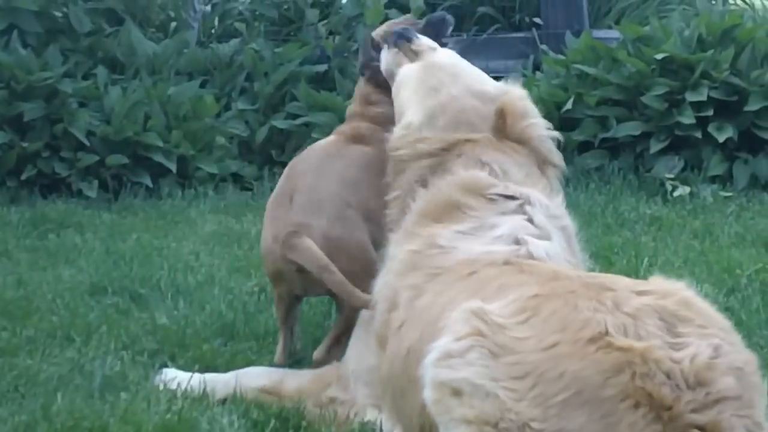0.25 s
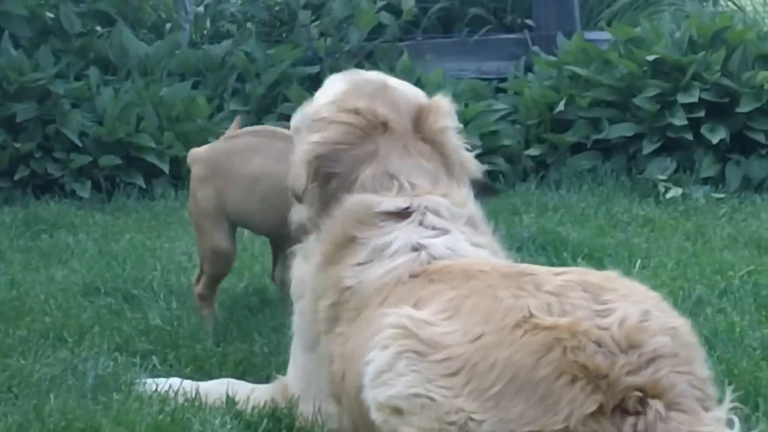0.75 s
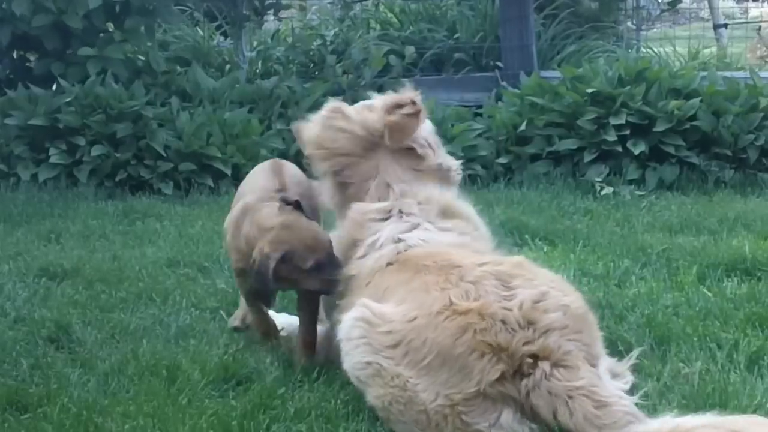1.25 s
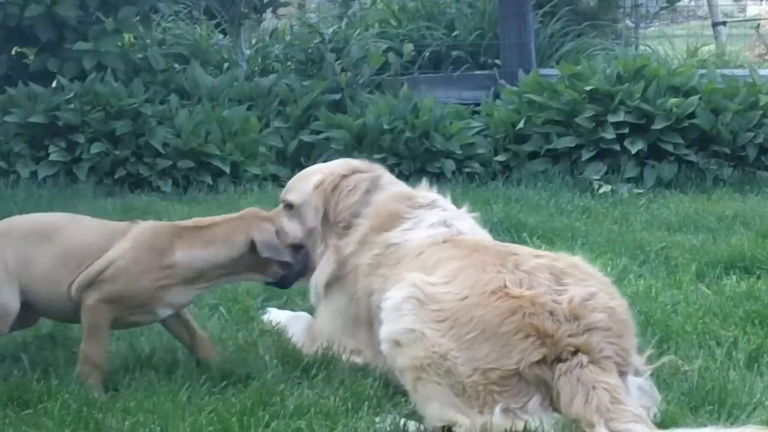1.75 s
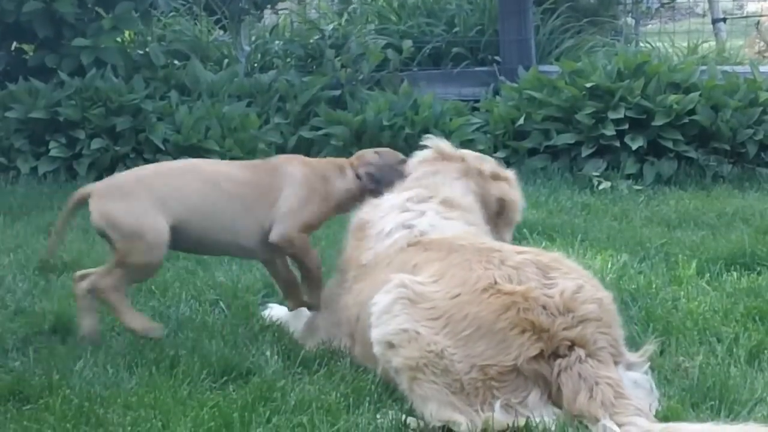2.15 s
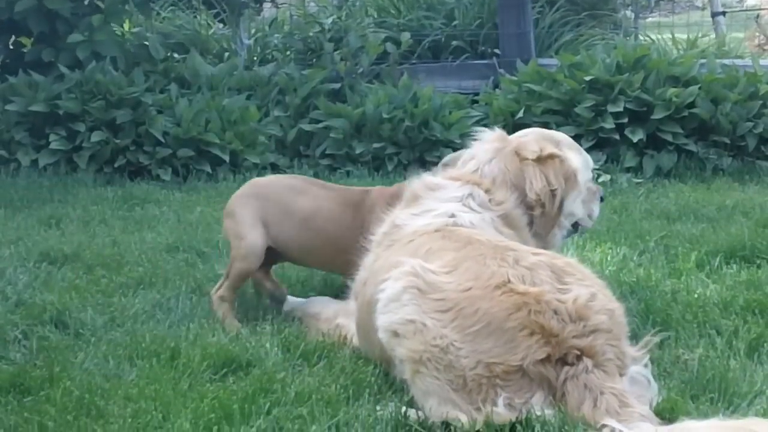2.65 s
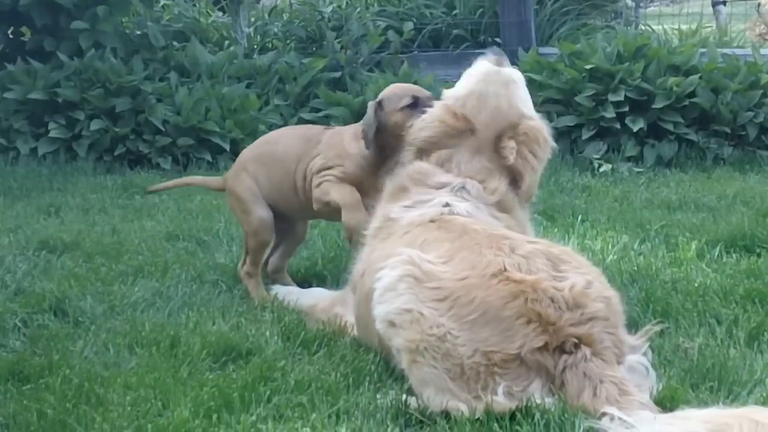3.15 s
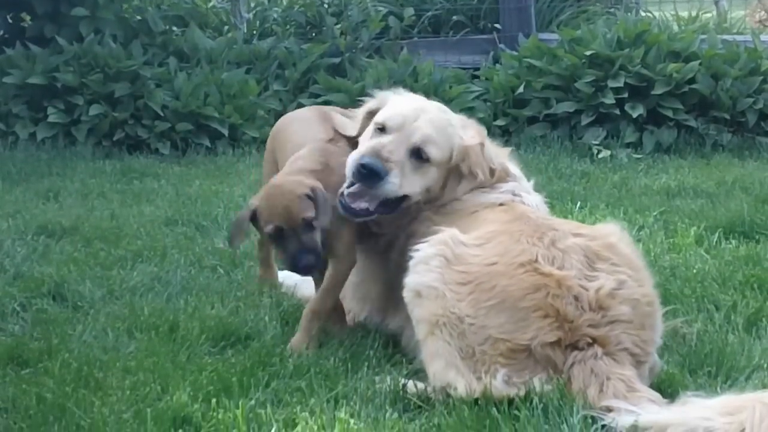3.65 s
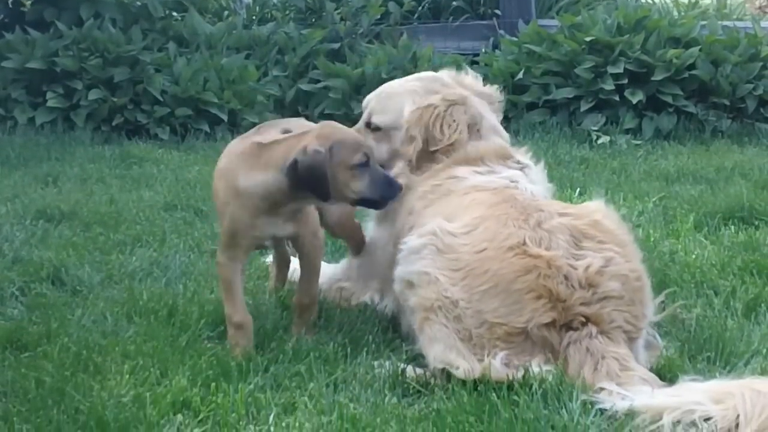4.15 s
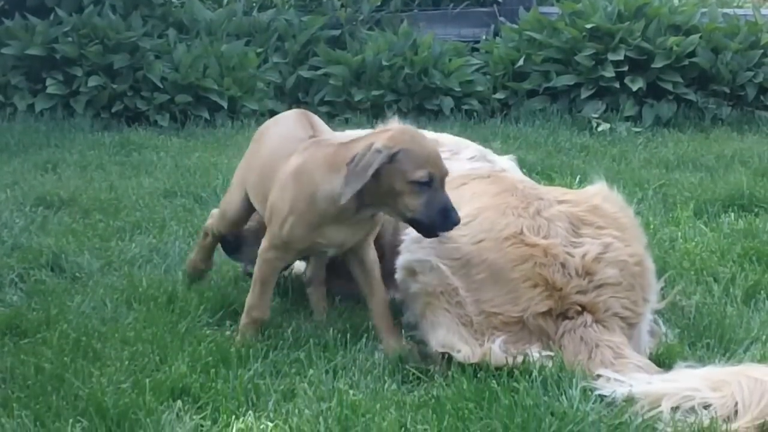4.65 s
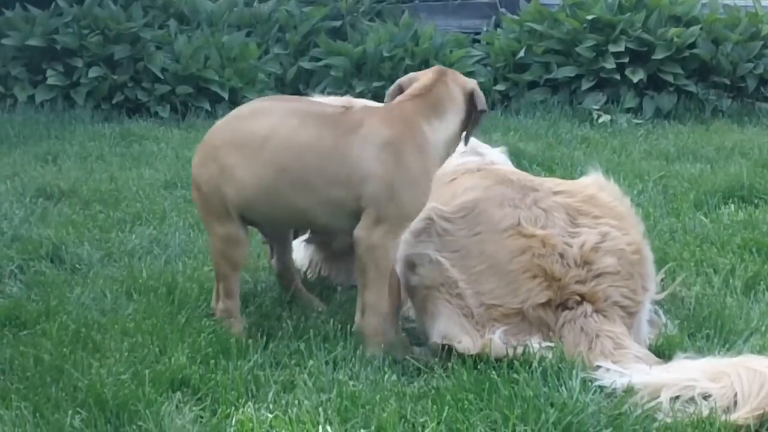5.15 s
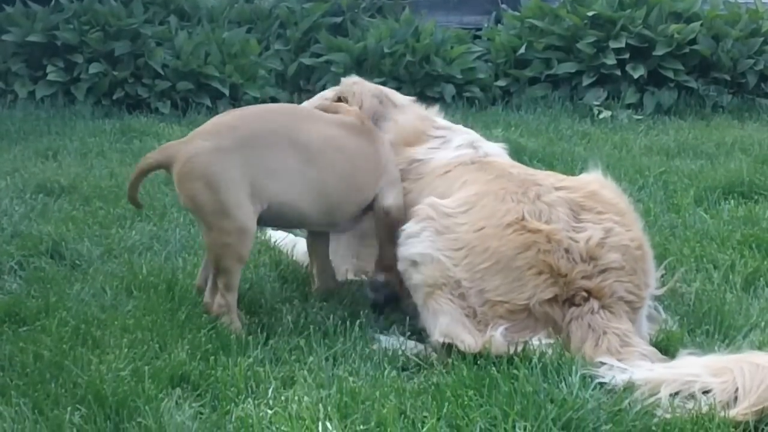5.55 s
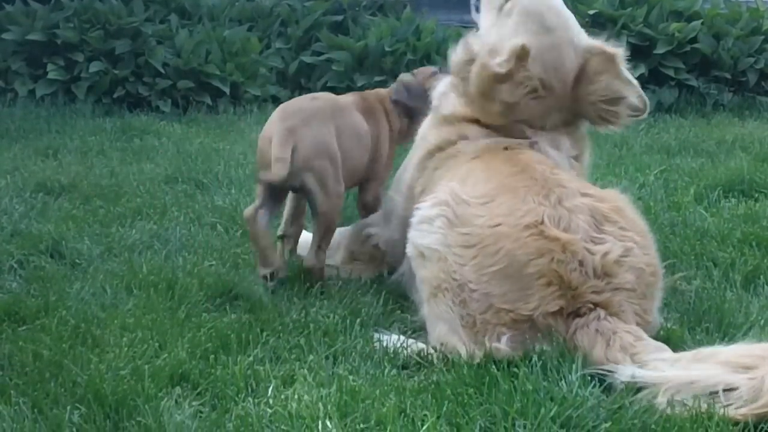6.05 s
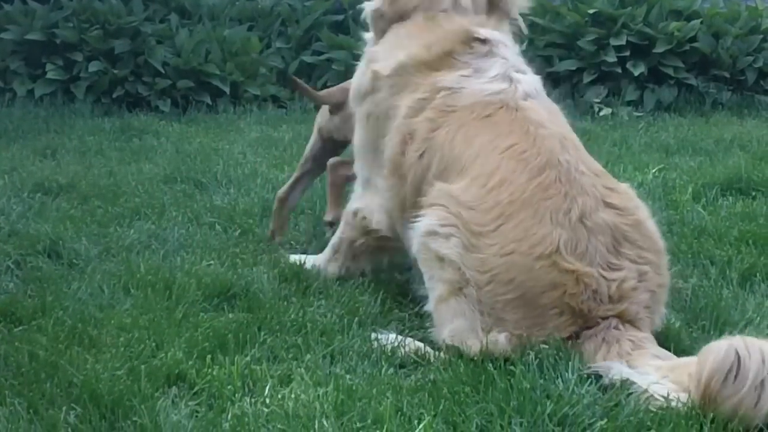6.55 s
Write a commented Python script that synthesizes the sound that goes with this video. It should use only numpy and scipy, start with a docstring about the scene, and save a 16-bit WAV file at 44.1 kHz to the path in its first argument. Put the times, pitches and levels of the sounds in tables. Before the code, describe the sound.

Outdoors, low wind buffets rumble over faint leaves and traffic while a far-off circular saw rasps, runs up, whines high and droops under load.

```python
"""A power saw some gardens away is blipped, coasts, restarts, runs up and sags under load.
Its teeth chop the air into a whine that follows the blade speed, with gear tones moving alongside.
Motor and blade noise rush through the guard, gears rasp at each start, and other modes sing for a moment.
Wind eddies thump on the single microphone port over far traffic and leaves; the loudest thumps
make the gain control duck."""
import sys
import numpy as np
from scipy import signal
from scipy.fft import rfft, irfft, next_fast_len
from scipy.io import wavfile
from scipy.ndimage import uniform_filter1d, map_coordinates

SR = 44100
rng = np.random.default_rng(int(sys.argv[2]) if len(sys.argv) > 2 else 0)


def put_to_file(sound):
    """Save the sound as 16-bit audio at rate SR, in the file named by the first command-line argument."""
    columns = np.atleast_2d(sound).T  # one column per channel
    safe = np.clip(columns, -1, 1)
    whole_steps = np.round(safe * 32767)
    wavfile.write(sys.argv[1], SR, whole_steps.astype(np.int16))


N = 300321

# far traffic and leaves, relative spectrum: freq_hz, density_db (per Hz)
YARD_SPECTRUM = [(350, -49), (600, -9.5), (787, -10.5), (1050, -11), (1130, -15), (1390, -10.5),
                 (2390, -21), (15300, -33.5)]
YARD_DB = -45.5  # rms

# wind buffeting between the eddies: time_s, level_db
BUFFET_LEVEL = [(0, -21), (.12, -44.5), (.45, -30), (.68, -41.5), (.78, -23), (1, -32), (1.1, -12.5),
                (1.4, -14.5), (1.76, -39), (2.04, -36), (2.15, -24), (2.28, -28), (2.45, -20.5),
                (2.56, -31.5), (2.8, -35), (2.9, -24), (3.25, -30), (3.34, -30.5), (3.55, -43.5),
                (3.92, -41), (3.98, -27.5), (4.27, -30), (4.36, -37), (4.6, -33), (4.9, -28.5),
                (5.28, -29.5), (5.4, -20.5), (5.62, -29), (5.7, -36), (5.89, -37), (5.95, -22.5),
                (6.12, -21.5), (6.33, -30), (6.43, -32), (6.54, -37)]
# relative spectrum of the buffeting: freq_hz, density_db (per Hz)
BUFFET_SPECTRUM = [(12, -49), (20, -36), (59, -0.5), (140, 3), (300, -13.5), (328, -10.5), (544, -20.5),
                   (586, -31.5), (700, -32.5), (910, -41), (1540, -120)]
# single eddies: centre_s, strength_db (before the thump filter), pitch_hz
EDDIES = [(.01, -8, 194), (.068, -20, 168), (.104, -18.5, 159), (.241, -15, 121), (.526, -6, 164),
          (.58, -11.5, 188), (.767, -2, 279), (.775, -3, 226), (.818, -4, 275), (.935, -10.5, 180),
          (.951, -10, 308), (.962, -9, 153), (1.016, -8, 218), (1.073, 1, 307), (1.113, 4, 187),
          (1.145, 1, 228), (1.16, 1, 213), (1.168, 1.5, 317), (1.194, -4, 157), (1.227, 1.5, 278),
          (1.242, 8.5, 286), (1.261, 0, 271), (1.301, 6.5, 292), (1.318, 1, 269), (1.349, 1, 200),
          (2.194, -11, 183), (2.237, -2, 224), (2.372, -6.5, 220), (2.485, 0, 211), (2.955, -12, 166),
          (2.995, -7.5, 230), (3.194, -9.5, 201), (3.266, -10, 178), (3.281, .5, 265), (4.094, -7, 177),
          (4.238, -7.5, 236), (4.691, -6, 200), (5.211, -10.5, 159), (5.331, -12, 253), (5.345, -10.5, 169),
          (5.475, -12, 215), (5.611, -12, 163), (6.006, -2.5, 198), (6.099, -7, 201), (6.141, -7, 187),
          (6.158, -4, 174), (6.327, -7.5, 195), (6.437, -12, 145), (6.669, -13.5, 230)]
# lesser eddies at random: strength over the buffet and its scatter, typical pitch and its log spread
FLUTTER_PER_S = 70
FLUTTER_DB, FLUTTER_SCATTER_DB, FLUTTER_HZ, FLUTTER_SPREAD = 9.5, 2.5, 207.5, .2

# the switch is pressed and the gears rasp: start_s, length_s (until the fade), level_db
STARTS = [(0.23, 0.14, -27), (1.114, 0.093, -26)]
# relative spectrum of the gear rasp: freq_hz, density_db (per Hz)
RASP_SPECTRUM = [(500, -6), (800, -10), (1100, -0.5), (1600, -4), (2200, 3), (2800, -11.5), (5000, -38)]
RASP_ATTACK_S, RASP_FADE_DB_PER_S = 0.025, 50

# broadband noise of the saw: time_s, body_db, hiss_over_body_db
RUSH_LEVEL = [(.236, -39.5, -7), (.26, -36.5, -7), (.4, -29.5, -8.5), (.46, -38.5, -3), (.56, -42.5, -4),
              (.85, -44.5, -6), (1.12, -43.5, -4.5), (1.14, -31.5, -7), (1.25, -34, -5),
              (1.64, -27.5, -2.5), (2.36, -27.5, -2), (2.6, -27.5, 0.5), (3.08, -30, -1.5),
              (3.15, -28.5, 1), (3.3, -30.5, 1.5), (3.7, -30.5, 1), (3.78, -29, 1.5), (5.2, -28, 0.5),
              (6, -28, -1.5), (6.3, -30, -2), (6.81, -27.5, -0.5)]
# depth of the hiss throb, once a turn of the blade: time_s, depth (0-1)
THROB_DEPTH = [(1.2, 0.3), (2, 0.26), (4.3, 0.26), (4.8, 0.2), (6.81, 0.28)]
# relative spectrum of the body noise: freq_hz, density_db (per Hz)
BODY_SPECTRUM = [(290, -30), (500, -10), (742, -15), (1050, -6), (1600, -7), (1890, -1), (2480, -4.5),
                 (2900, 0), (4870, -6.5), (6000, -10), (7800, -10.5), (13200, -120)]
# relative spectrum of the blade hiss: freq_hz, density_db (per Hz)
HISS_SPECTRUM = [(3500, -2.5), (5500, -4), (7000, -2), (8500, 3.5), (10800, 2), (12000, -12), (13500, -7.5),
                 (15500, -4.5)]
# resonances of guard and blade: centre_hz, width_hz, lift_db
GUARD_MODES = [(1064, 37, 6.5), (1208, 20, 5.5), (1884, 37, 1.5), (2342, 26, 7), (2868, 18, 4.5),
               (3066, 57, 3), (3920, 61, 3), (4254, 22, 7), (4960, 140, 7), (8090, 115, 7.5),
               (9350, 104, 4.5)]

TEETH = 61
# speed of the saw, coasting, running up, sagging: time_s, tooth_whine_hz
SPEED = [(.42, 3930), (.55, 3750), (.8, 3360), (1.14, 2840), (1.19, 2660), (1.32, 3327), (1.45, 3887),
         (1.62, 4429), (1.75, 4670), (1.9, 4865), (2.15, 5072), (2.5, 5236), (3.1, 5395), (3.75, 5441),
         (4.05, 5390), (4.45, 5232), (4.75, 5025), (5.2, 4905), (5.55, 4768), (6.2, 4665), (6.81, 4667)]
# span of each state: start_s, end_s
COAST_SPAN = (.43, 1.14)
RUN_SPAN = (1.17, 6.76)
LOAD_SPAN = (4.2, 6.9)
# gear tones that swell as they cross a resonance, one table a state:
# whine_multiple, resonance_hz, resonance_width_hz, level_db, tone_width_hz
COAST_TONES = [(1.31, 4960, 250, -46, 6), (.5, 1810, 100, -37, 6), (.645, 2250, 110, -43, 6),
               (1, 2970, 300, -46, 6), (3.03, 9400, 1000, -52, 700)]
RUN_TONES = [(2, 9850, 400, -42, 8)]
LOAD_TONES = [(1.57, 7950, 800, -37, 200), (2.345, 11000, 700, -43, 200)]
# how loud the whine leaves the guard at each pitch: pitch_hz, level_db
WHINE_LEVEL = [(2650, -41), (3400, -42), (4430, -43), (4660, -40), (4720, -34), (4775, -44), (4850, -32),
               (4960, -29), (5110, -29), (5240, -36), (5320, -32), (5440, -31)]
WAVER_DB = 1  # slow unsteadiness of the whine
TORQUE_DB, TORQUE_HZ_PER_S = 6, 900  # most lift of the whine, and the climb in pitch that sets its scale

# pitch of one faint singing mode: time_s, pitch_hz
SING_PITCH = [(5.9, 1858), (6.3, 1842), (6.81, 1838)]
# swells of that mode: middle_s, length_s, level_db
SING_SWELLS = [(4.02, .4, -37), (5.85, .2, -35), (6.13, .15, -42), (6.46, .09, -38), (6.6, .09, -38)]
SING_DB, SING_FROM_S = -41.5, 3.03
# other modes of blade and guard that sound for a moment: pitch_hz, start_s, end_s, level_db, width_hz
CHIRPS = [(9150, .54, 0.82, -48, 800), (9600, 1.4, 1.56, -35, 540), (6650, 1.52, 1.8, -41, 250),
          (9700, 1.57, 1.76, -36, 300), (2000, 2.11, 2.28, -31, 15), (1825, 2.56, 2.76, -35, 15),
          (1960, 5.17, 5.34, -33.5, 20)]

LIMIT_DB, DUCK_S, RECOVER_DB_PER_S = -5.5, 0.0074, 10.5  # peak limit, time constant down, slow climb back
# missing band of the treble: low_hz, high_hz
GAP_BAND = (12290, 12710)
TOP_HZ = 15310  # band limit
CEILING = .9  # amplitude toward which loud thumps are rounded off


def amp(db):
    """Logarithmic level: decibels to an amplitude ratio."""
    return 10 ** (np.asarray(db) / 20)


def unit(x):
    """Normalisation to rms 1."""
    return x / np.sqrt(np.mean(x ** 2) + 1e-20)


def curves(rows):
    """Linear interpolation: one value per sample for each column after the time."""
    s, *cols = np.transpose(rows)
    return [np.interp(np.arange(N) / SR, s, c) for c in cols]


def window(start, end, edge):
    """Gating: 1 between the two times, with straight ramps just inside them."""
    t = np.arange(N) / SR
    return np.clip(np.minimum(t - start, end - t) / edge, 0, 1)


def wobble(rate):
    """Slow random modulation: a smooth curve through normal random knots, rate knots a second."""
    knots = rng.standard_normal(int(N * rate / SR) + 4)
    return map_coordinates(knots, [np.arange(N) * rate / SR])


def filtered(x, response):
    """Linear filtering: the spectrum of x times a response of frequency."""
    m = next_fast_len(N + 8192)
    return irfft(rfft(x, m) * response(np.fft.rfftfreq(m, 1 / SR)), m)[..., :N]


def noise(points, patchy_db=0, modes=(), band_hz=(0, 1e5)):
    """Spectral shaping: noise with patches of random gain and raised modes, rms 1 inside the band."""
    z = signal.stft(rng.standard_normal(N), nperseg=512)[2]
    field = uniform_filter1d(rng.standard_normal(z.shape), size=8, axis=0)
    field = uniform_filter1d(field, size=12, axis=1)
    patchy = signal.istft(z * amp(patchy_db * unit(field)), nperseg=512)[1][:N]
    # fall to silence an octave beyond either end
    below, above = (points[0][0] / 2, -120), (points[-1][0] * 2, -120)
    f, level = np.transpose([below] + list(points) + [above])

    def response(hz):
        lift = sum(db / (1 + (2 * (hz - c) / w) ** 2) for c, w, db in modes)
        return amp(np.interp(np.log(hz + 1), np.log(f), level) + lift)

    x = filtered(patchy, response)
    inside = filtered(x, lambda hz: (hz > band_hz[0]) & (hz < band_hz[1]))
    return x / np.sqrt(np.mean(inside ** 2))


def tone(hz, blur, flutter_db):
    """Phase and amplitude modulation: an unsteady sine, rms about 1."""
    size = np.sqrt(2) * amp(flutter_db * wobble(25))
    phase = 2 * np.pi * np.cumsum(hz) / SR + blur * wobble(60)
    return size * np.sin(phase)


def fuzzy(hz, width_hz):
    """Narrow-band modulation: noise rides on a carrier that follows a pitch curve, rms 1."""
    carrier = np.exp(2j * np.pi * np.cumsum(hz) / SR)
    core = 1.2 * (width_hz < 50)  # narrow ones keep a clear core
    return unit(np.real((core + wobble(width_hz) + 1j * wobble(width_hz)) * carrier))


def blade_turn(whine_hz):
    """Tooth passing: the blade turns once for every TEETH cycles of the whine; phase in radians."""
    return 2 * np.pi * np.cumsum(whine_hz / TEETH) / SR


def yard():
    """Diffuse background: far traffic and leaves merge into steady coloured noise."""
    return amp(YARD_DB) * noise(YARD_SPECTRUM)


def flutter():
    """Random arrivals: small eddies at random times, stronger where the wind is stronger."""
    count = int(FLUTTER_PER_S * N / SR)
    s = rng.random(count) * N / SR
    size, pitch = rng.standard_normal((count, 2)).T
    buffet_db = np.interp(s, *np.transpose(BUFFET_LEVEL))
    strength_db = buffet_db + FLUTTER_DB + FLUTTER_SCATTER_DB * size
    return np.transpose([s, strength_db, FLUTTER_HZ * np.exp(FLUTTER_SPREAD * pitch)])


def wind():
    """Turbulent pressure: lumpy buffeting, and eddies of about one cycle; small fast ones also snap."""
    buffet = amp(curves(BUFFET_LEVEL)[0]) * unit(amp(5.6 * wobble(50)) * noise(BUFFET_SPECTRUM))
    t = np.arange(-1500, 1500) / SR  # time about the centre of an eddy
    eddies = [*EDDIES, *flutter()]
    thumps = np.zeros(N + 2 * len(t))
    phases = rng.random((len(eddies), 2))
    for (s, db, hz), (phase, snap_phase) in zip(eddies, phases):
        push = np.exp(-np.abs(t * hz / 0.38) ** 1.16) * np.cos(2 * np.pi * (hz * t + phase))
        snap = np.exp(-(t / .0012) ** 2) * np.cos(2 * np.pi * (2.4 * hz * t + snap_phase))
        snap_gain = amp(-15.5) * (hz / 280) ** 3.0
        thumps[round(s * SR):][:len(t)] += amp(db) * (push + snap_gain * snap)
    thumps = thumps[len(t) // 2:][:N]
    # low cut at 50 Hz, high cut at 1300 Hz
    thumps = filtered(thumps, lambda f: f ** 2 / (f ** 2 + 50 ** 2) / (1 + (f / 1300) ** 4))
    return buffet + thumps


def rasp():
    """Gear meshing: grainy noise under the starting torque, fading once it is over."""
    t = np.arange(N) / SR
    level = np.zeros(N)
    for s, length, db in STARTS:
        fade_db = RASP_FADE_DB_PER_S * np.clip(t - s - length, 0, None)
        level += amp(db - fade_db) * window(s, 9, RASP_ATTACK_S)
    return level * unit(amp(1.4 * wobble(250)) * noise(RASP_SPECTRUM, patchy_db=0.5))


def rush():
    """Resonant radiation: motor and blade noise through the guard; the hiss throbs as the blade wobbles."""
    body_db, hiss_db = curves(RUSH_LEVEL)
    turn = blade_turn(curves(SPEED)[0])
    throb = 1 + np.clip(curves(THROB_DEPTH)[0], 0, 1) * np.sin(turn + .5 * wobble(5.7))
    surge_db = 0.32 * wobble(14)
    body = noise(BODY_SPECTRUM, patchy_db=0.5, modes=GUARD_MODES, band_hz=(2500, 4400))
    hiss = noise(HISS_SPECTRUM, patchy_db=1.5, modes=GUARD_MODES, band_hz=(6000, 11000))
    both = amp(body_db) * body + amp(body_db + hiss_db) * throb * hiss
    return both * amp(surge_db) * window(0.236, 9, 0.0036)


def gear_tones(table, span):
    """Forced resonance: each tone follows the speed and swells near its mode; wide ones throb each turn."""
    hz, = curves(SPEED)
    turn = np.sin(blade_turn(hz))
    total = np.zeros(N)
    for multiple, peak_hz, reach_hz, db, width_hz in table:
        swell = amp(db) / np.sqrt(1 + (2 * (multiple * hz - peak_hz) / reach_hz) ** 4)
        throb = 1 + .6 * (width_hz > 50) * turn
        total += swell * throb * fuzzy(multiple * hz, width_hz)
    return window(*span, .06) * total


def whine():
    """Siren principle: the teeth chop the air at a rate set by the speed; gear orders move with them."""
    hz, = curves(SPEED)
    climb = np.clip(uniform_filter1d(np.gradient(hz) * SR, size=4000), 0, None)  # Hz per s
    torque_db = TORQUE_DB * np.tanh(climb / TORQUE_HZ_PER_S)
    level_db = np.interp(hz, *np.transpose(WHINE_LEVEL)) + torque_db + WAVER_DB * wobble(7)
    teeth = amp(level_db) * tone(hz, blur=0.46, flutter_db=2.0) * window(*RUN_SPAN, .04)
    coast, run = gear_tones(COAST_TONES, COAST_SPAN), gear_tones(RUN_TONES, RUN_SPAN)
    return teeth + coast + run + gear_tones(LOAD_TONES, LOAD_SPAN)


def sing():
    """Modal vibration: brief fuzzy bands of blade and guard, and one faint mode that lasts and swells."""
    t = np.arange(N) / SR
    level = amp(SING_DB) * window(SING_FROM_S, 9, 0.11)
    for s, length, db in SING_SWELLS:
        level += amp(db) * np.exp(-(2 * (t - s) / length) ** 4)
    sound = level * tone(curves(SING_PITCH)[0], blur=.5, flutter_db=2.5)
    for hz, start, end, db, width_hz in CHIRPS:
        sound += amp(db) * window(start, end, .05) * fuzzy(np.full(N, hz), width_hz)
    return sound


def scene():
    """Superposition: the sounds add at one microphone, which feeds both channels."""
    mono = whine() + rush() + rasp() + sing() + wind() + yard()
    return np.array([mono, mono])


def gain_control(x):
    """Peak limiting: gain heads for what holds each peak at the limit, lags, and recovers steadily."""
    size = np.abs(signal.hilbert(x, next_fast_len(N))[:N]) + 1e-9  # envelope
    climb_db = RECOVER_DB_PER_S * np.arange(N) / SR
    need_db = np.minimum(0, LIMIT_DB - 20 * np.log10(size))
    gain_db = np.minimum.accumulate(need_db - climb_db) + climb_db
    keep = np.exp(-1 / (DUCK_S * SR))
    return x * amp(signal.lfilter([1 - keep], [1, -keep], gain_db))


def record(dry):
    """Saturation and band limiting: gain control, a rounded ceiling, then a treble gap and a top limit."""
    dry = np.array([gain_control(x) for x in dry])
    dry = dry / (1 + np.abs(dry / CEILING) ** 6) ** (1 / 6)
    return filtered(dry, lambda hz: (hz < TOP_HZ) & ((hz < GAP_BAND[0]) | (hz > GAP_BAND[1])))


dry = scene()
out = record(dry)
put_to_file(out)
```